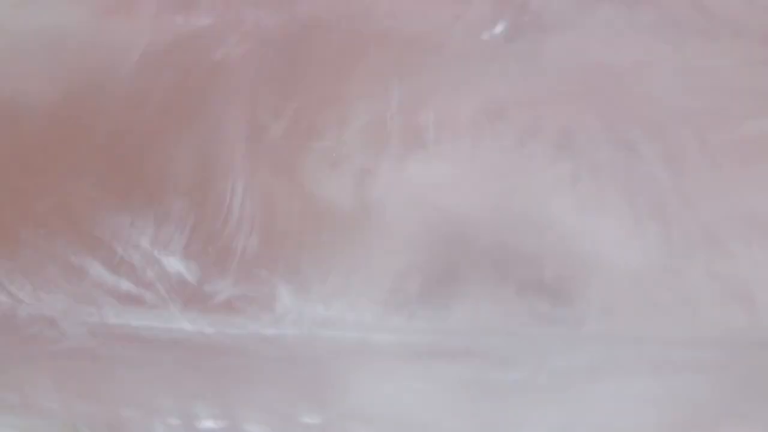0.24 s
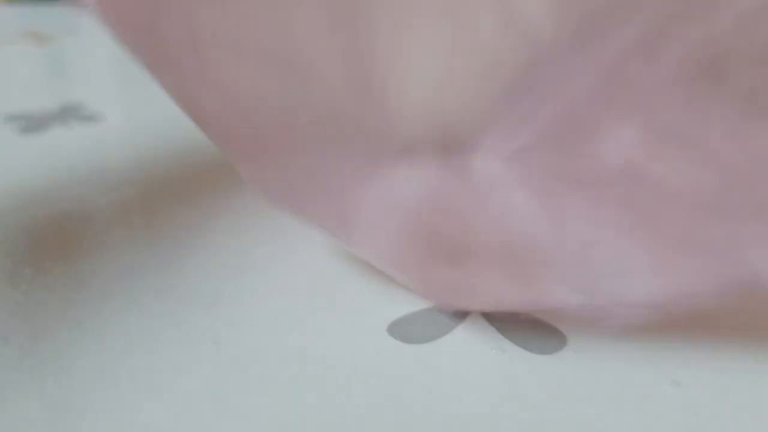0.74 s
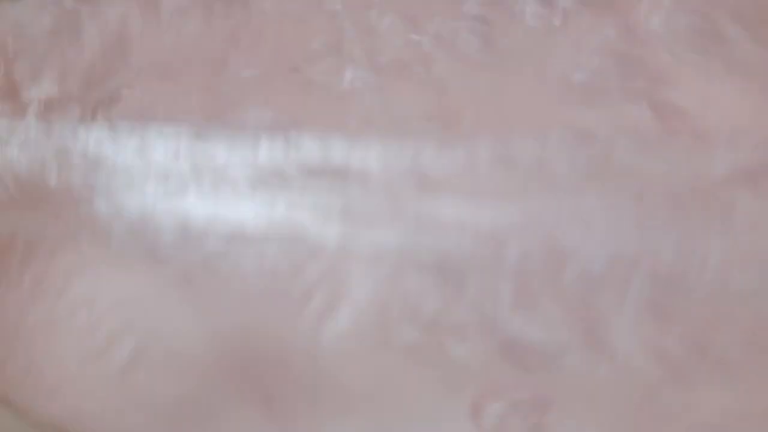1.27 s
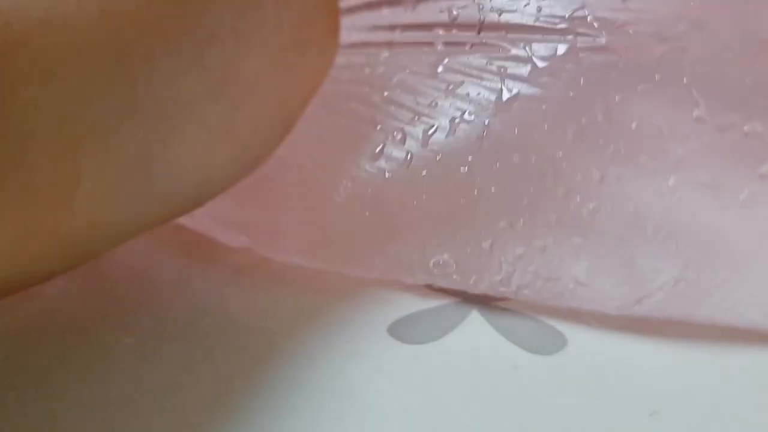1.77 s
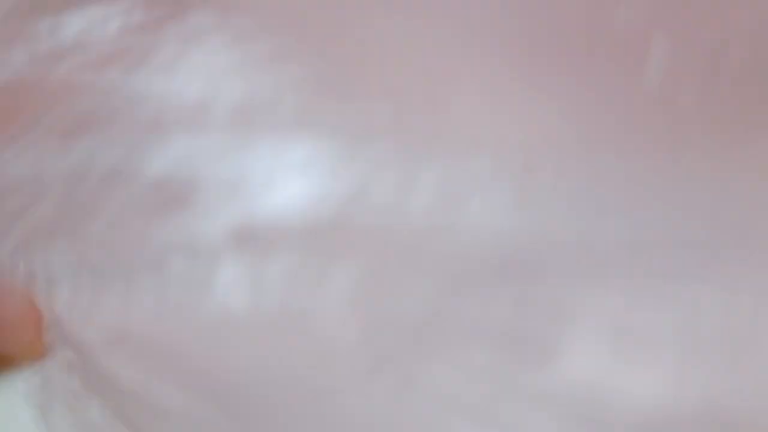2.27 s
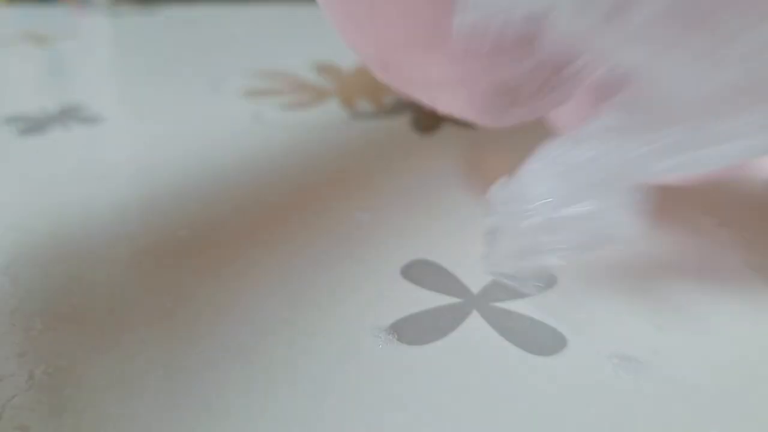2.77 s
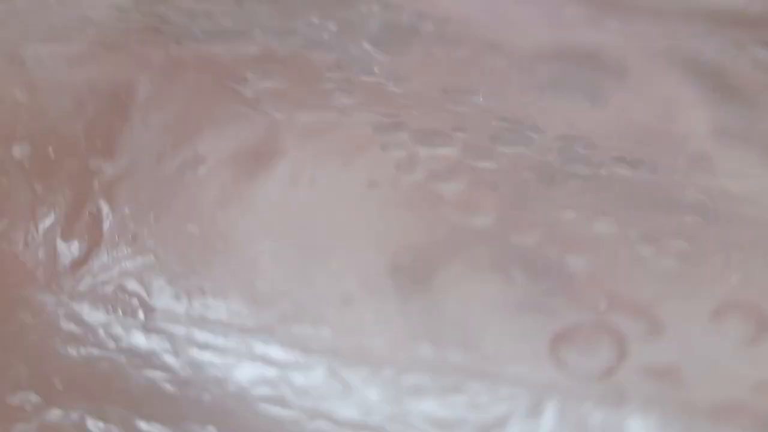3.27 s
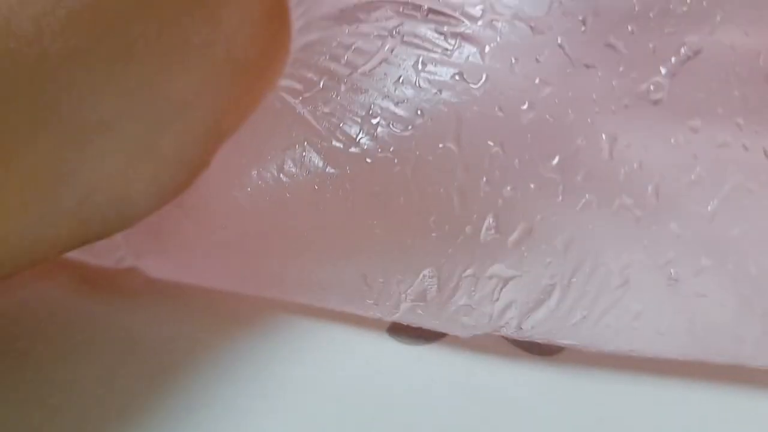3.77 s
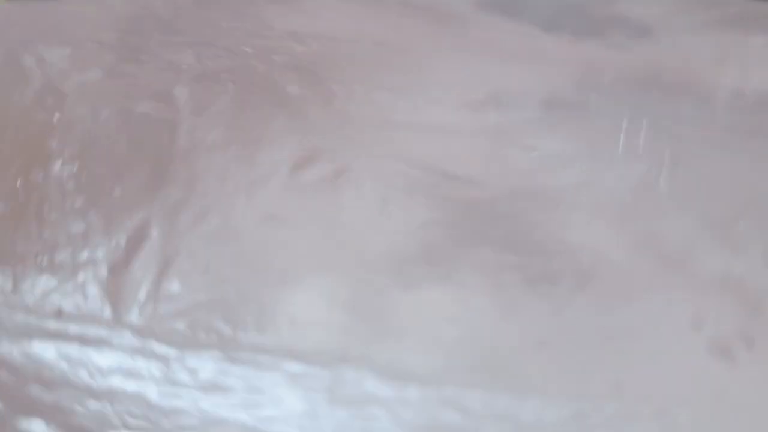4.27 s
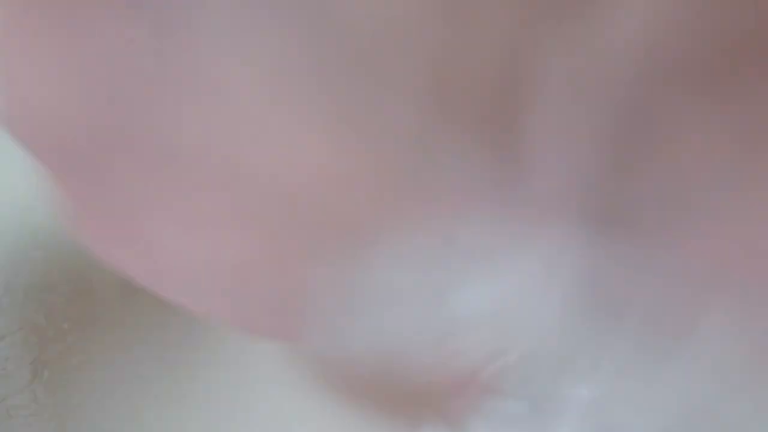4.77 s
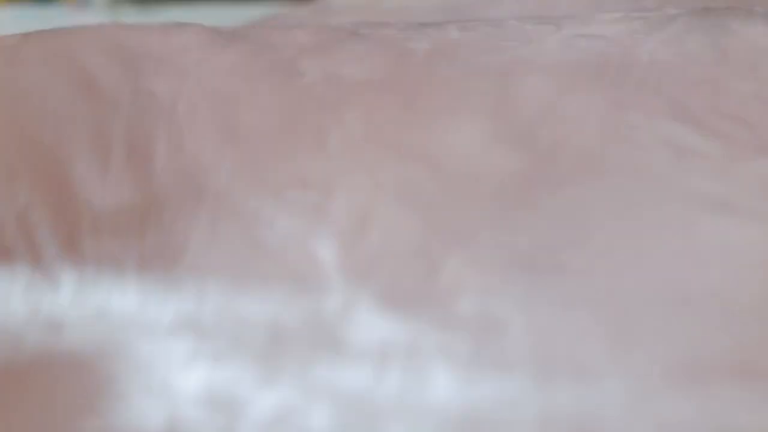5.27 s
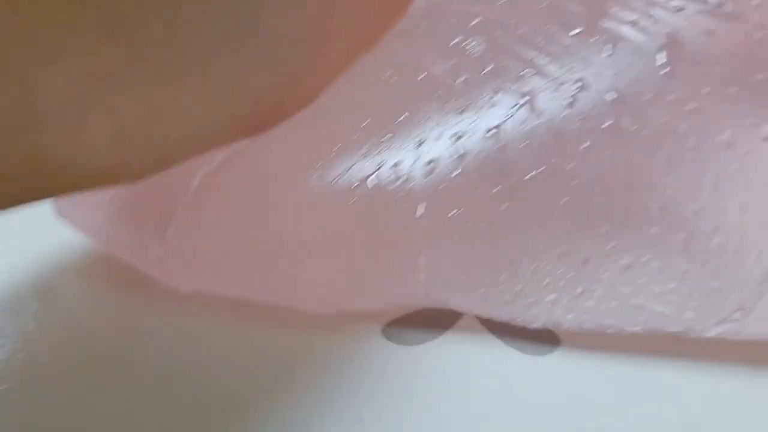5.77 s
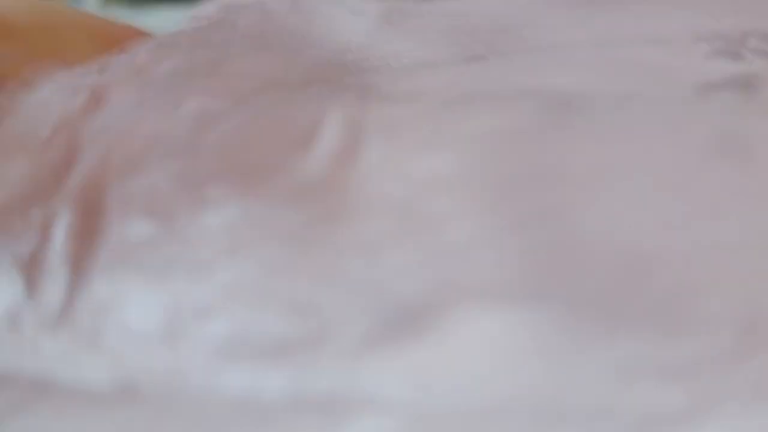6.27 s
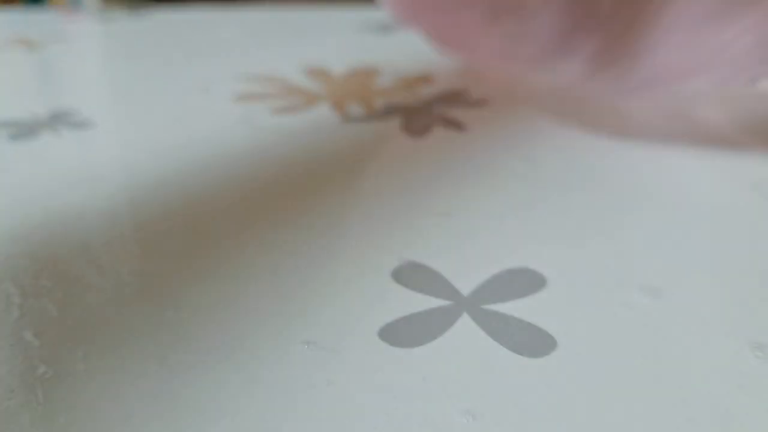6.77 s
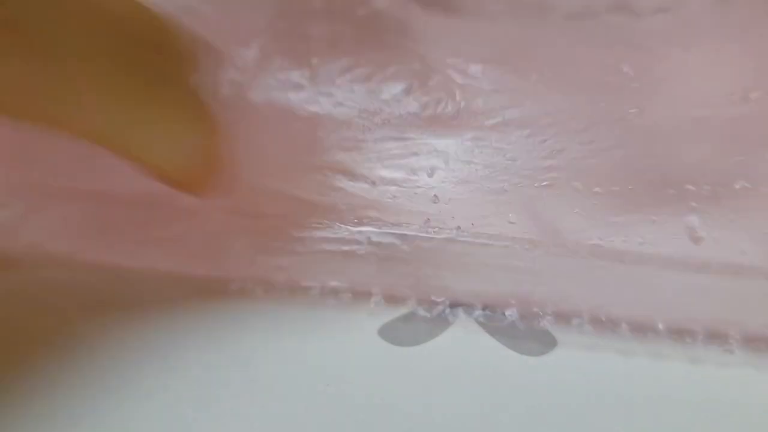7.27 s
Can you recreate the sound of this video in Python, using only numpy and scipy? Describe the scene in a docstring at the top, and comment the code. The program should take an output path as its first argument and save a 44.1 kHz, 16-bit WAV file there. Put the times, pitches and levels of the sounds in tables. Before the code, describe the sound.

Very close to the microphone, fingers press, fold and squeeze a soft lump of slime on a table. Irregular bursts of wet squelch and sticky crackle swell and fade, studded with sharp little pops as trapped air bursts. The strongest presses come near one second, just before two, after three, near four and at five and a half, with quieter fiddling between. Small quiet room, short tail, faint hiss.

```python
"""Squeezing a lump of slime

Fingers press, fold and squeeze slime on a table, close to the microphone in a small quiet room with faint hiss.
When a trapped air pocket bursts, shaped noise makes the tick and crack of its skin, a short sine its cavity.
Random clicks through resonators make squelch, bubbles and sticky crackle that swell with each press.
Closing folds gloop, sinking sines thump under the strongest slaps, and the room adds tail and standing waves."""
import sys
import numpy as np
from scipy import signal
from scipy.fft import rfft, irfft
from scipy.io import wavfile
from scipy.ndimage import uniform_filter1d

SR = 44100
rng = np.random.default_rng(int(sys.argv[2]) if len(sys.argv) > 2 else 0)


def materialize(psi):
    """Save the field psi as 16-bit PCM at rate SR to the path in sys.argv[1].

    A 1-D psi becomes a single channel; in a 2-D psi each row is a channel.
    """
    bounded = np.clip(np.atleast_2d(psi).T, -1, 1)
    quanta = np.round(bounded * 32767).astype(np.int16)
    wavfile.write(sys.argv[1], SR, quanta)


N = 332073  # length in samples


def from_db(db):
    """Turn decibels into a gain."""
    return 10 ** (np.asarray(db) / 20)


def rms_one(x):
    """Scale a sound to an rms (average strength) of 1."""
    return x / np.sqrt(np.mean(x ** 2) + 1e-20)


def at_hz(points, hz):
    """Read a table of (Hz, value) between its points, on a log-frequency axis."""
    known_hz, values = np.transpose(points)
    return np.interp(np.log(np.maximum(hz, 1)), np.log(known_hz), values)


def response(spectrum, size=2048):
    """Make a filter for a colour: it never sounds ahead of its input (minimum phase) and has unit energy."""
    level_db = at_hz(spectrum, np.fft.rfftfreq(size, 1 / SR))
    cepstrum = irfft(np.log(from_db(level_db)))
    # folding the second half onto the first gives minimum phase
    cepstrum[1:size // 2] *= 2
    cepstrum[size // 2 + 1:] = 0
    impulse = irfft(np.exp(rfft(cepstrum)))
    return rms_one(impulse) / np.sqrt(size)


def colour(x, spectrum):
    """Filter a sound so that its frequencies get the balance of a colour table."""
    return signal.fftconvolve(x, response(spectrum))[:len(x)]


def own_colour(spectrum, spread_db, shift=1):
    """No two skins tear alike: each gets its own peaks and dips, and may lie higher or lower."""
    hz, level_db = np.transpose(spectrum)
    return np.column_stack([hz * shift, level_db + spread_db * rng.standard_normal(len(hz))])


def add(out, s, sound):
    """Mix a sound in at a time in seconds."""
    start = max(round(s * SR), 0)
    out[start:start + len(sound)] += sound[:max(N - start, 0)]


def resonator(hz, t60):
    """Filter coefficients of something that rings at hz and dies by 60 dB in t60 seconds."""
    r, w = from_db(-60 / (t60 * SR)), 2 * np.pi * hz / SR
    return [1 - r, 0, r - 1], [1, -2 * r * np.cos(w), r * r]


def hiss(level_db=-76.5):
    """Faint steady hiss: random noise with a colour of its own."""
    # Balance of the hiss. Each row: frequency in Hz, relative level in dB per Hz.
    hiss_colour = [(20, -15), (60, 7), (150, 1.5), (500, -12.5), (1000, -0.5), (2000, -21), (5500, -15.5),
                   (8200, 3), (10500, -2.5), (12000, -44.5), (16000, -16.5)]
    return from_db(level_db) * rms_one(colour(rng.standard_normal(N), hiss_colour))


def tear(t, noise, t60, rise_s, lumpy_db):
    """A skin gives way in a rush of uneven little snaps."""
    lumps = rms_one(uniform_filter1d(noise[1], round(SR / 2000)))
    strength = from_db(lumpy_db * lumps - 60 * t / t60)
    return noise[0] * strength * (1 - np.exp(-(t / rise_s) ** 2))


def cavity(t, hz, t60, opening_cycles, rise):
    """An air pocket swells over its first cycles, then dies; its pitch climbs by rise, or sinks if negative."""
    pitch = hz * (1 + rise * (np.tanh(t / t60 * 2) - .5))
    swell = 1 - np.exp(-(t * hz / opening_cycles) ** 2)
    return np.sin(2 * np.pi * np.cumsum(pitch) / SR) * swell * from_db(-60 * t / t60)


def pops(rows, tick_t60=0.022, crack_t60=0.048, upper_ratio=1.45, upper_db=-11, low_hz=170, size=2048):
    """Each burst is a tearing skin (tick and crack) and its ringing cavity; returns direct sound and room feed."""
    # Balance of the bright tick, then of the skin crack.
    # Each row: frequency in Hz, relative level in dB per Hz.
    tick_colour = [(100, -46), (3000, -23.5), (5500, -14), (6500, -3.5), (7200, -5), (8000, 6), (9000, 2.5),
                   (10400, -7), (11000, -17), (11700, -55.5), (13400, -23.5), (15500, -47)]
    crack_colour = [(150, -35.5), (500, -13), (1500, 4.5), (3000, 4), (4600, 0.5), (5600, -19.5),
                    (8000, -33.5)]
    level_span_s = .005  # the row levels are rms over this time
    usual_pocket_hz, crack_follows_pitch = 1400, 0.14  # a smaller pocket has a higher crack
    skin_room_db, cavity_room_db = -0.5, 1  # share of each that reaches the room

    direct, feed, t = np.zeros(N), np.zeros(N), np.arange(size) / SR
    chance = rng.standard_normal((len(rows), 4, size))
    scale = np.sqrt(level_span_s * SR / size)
    for (s, tick_db, crack_db, body_db, hz, t60), noise in zip(rows, chance):
        snap = tear(t, noise[:2], tick_t60, rise_s=0.00036, lumpy_db=9.0)
        snap = rms_one(colour(snap, own_colour(tick_colour, spread_db=3.0)))
        crack = tear(t, noise[2:], crack_t60, rise_s=0.0011, lumpy_db=3.0)
        shift = (hz / usual_pocket_hz) ** crack_follows_pitch
        crack = rms_one(colour(crack, own_colour(crack_colour, spread_db=4.5, shift=shift)))
        skin = from_db(tick_db) * snap + from_db(crack_db) * crack
        # a flattened pocket has a second, weaker mode above its first
        main, upper = [rms_one(cavity(t, hz * ratio, t60, opening_cycles=2.43, rise=0.14))
                       for ratio in (1, upper_ratio)]
        ring = from_db(body_db) * (main + from_db(upper_db) * upper)
        add(direct, s, scale * (skin + ring))
        add(feed, s, scale * (from_db(skin_room_db) * skin + from_db(cavity_room_db) * ring))
    # such small sources radiate hardly any bass
    bass_cut = signal.butter(2, low_hz, "high", fs=SR, output="sos")
    return signal.sosfilt(bass_cut, np.array([direct, feed]) + 1e-18)


def effort():
    """Each press swells to its peak and fades; returns the levels of squelch, bubbles and crackle in dB."""
    # Presses and pulls of the fingers. Each row: time of greatest force in seconds, swell in seconds,
    # fade in seconds, then base levels in dB of the deep squelch, small bubbles and sticky crackle.
    presses = [(.005, 0.023, 0.032, -62, -44.5, -47), (.1, 0.052, 0.089, -84, -54, -48.5),
               (0.208, 0.075, 0.11, -51.5, -34.5, -33.5), (0.532, 0.051, 0.052, -57, -55, -53),
               (0.663, 0.058, 0.093, -77, -50, -44), (.88, 0.12, 0.16, -88, -75, -67),
               (0.978, 0.036, 0.18, -52, -31, -31), (1.094, 0.025, 0.098, -40, -38, -46.5),
               (1.451, 0.065, 0.14, -53, -46, -46), (1.55, 0.06, 0.14, -51, -44.5, -47.5),
               (1.69, 0.089, 0.1, -43, -33.5, -33.5), (1.749, 0.12, 0.15, -50.5, -41.5, -46.5),
               (1.9, .04, 0.13, -74, -51, -52), (2.075, 0.087, 0.12, -62, -38.5, -51.5),
               (2.25, 0.054, .09, -81, -46.5, -53.5), (2.44, 0.088, 0.095, -80, -41.5, -44),
               (2.559, .04, 0.025, -67.5, -55.5, -72), (2.724, 0.032, 0.13, -67.5, -66.5, -62.5),
               (2.86, 0.045, 0.083, -78, -43.5, -43), (2.96, 0.036, 0.031, -85.5, -56, -48),
               (3.031, 0.11, 0.13, -91.5, -76, -66.5), (3.259, 0.1, 0.12, -33, -35, -36.5),
               (3.599, 0.022, 0.05, -71, -55, -50), (3.76, 0.13, 0.15, -43.5, -43.5, -40.5),
               (3.888, 0.052, 0.056, -27.5, -30, -43), (4.01, 0.1, 0.13, -55.5, -50, -51.5),
               (4.16, 0.15, 0.14, -70, -50, -59), (4.331, 0.086, 0.14, -91, -60.5, -60),
               (4.46, .08, 0.12, -92, -62, -57), (4.658, 0.063, 0.11, -49, -37.5, -31.5),
               (4.77, 0.036, 0.056, -50.5, -63, -44.5), (4.99, 0.025, 0.088, -53.5, -55, -55.5),
               (5.181, 0.055, 0.09, -67, -44, -38.5), (5.35, .1, 0.17, -95, -73.5, -65.5),
               (5.52, 0.062, 0.12, -40.5, -26.5, -32.5), (5.59, .05, 0.083, -31, -37.5, -38.5),
               (5.986, 0.037, 0.074, -63, -50.5, -48), (6.075, .08, 0.15, -53.5, -46, -43.5),
               (6.15, 0.043, 0.045, -44.5, -38, -50), (6.225, 0.056, 0.071, -47, -48.5, -43.5),
               (6.29, .05, 0.21, -50.5, -46, -46), (6.38, 0.098, 0.095, -56.5, -55.5, -44.5),
               (6.48, 0.033, 0.082, -84, -61, -53.5), (6.601, 0.053, 0.14, -70, -39.5, -48.5),
               (6.66, 0.063, 0.07, -75.5, -43, -44), (6.87, 0.057, .04, -83, -74, -53),
               (6.94, 0.057, 0.092, -58.5, -38.5, -33), (7.02, 0.058, 0.091, -54.5, -41.5, -44.5),
               (7.26, 0.041, .06, -70.5, -59, -59), (7.334, 0.023, 0.035, -47, -32, -48),
               (7.413, 0.12, 0.13, -68.5, -49, -47)]
    # a swell or fade spans 20 dB; the squelch needs more force: it comes later and stops sooner
    swing_db = 20 * np.array([[1.3], [1], [1]])
    swell_shape, fade_shape = 1.61, 1.09  # 1 is a straight slope in dB, 2 a rounded one
    # before a swell and after a fade the sound drops this quickly
    finger_lands_s, finger_lifts_s = 0.012, .05

    t = np.arange(0, N / SR, .002)
    power = np.full((3, len(t)), 1e-12)
    for s, swell_s, fade_s, *levels_db in presses:
        early, late = np.maximum(s - t, 0), np.maximum(t - s, 0)
        slack = (early / swell_s) ** swell_shape + (late / fade_s) ** fade_shape
        before = np.maximum(early - swell_s, 0) / finger_lands_s
        after = np.maximum(late - fade_s, 0) / finger_lifts_s
        drop_db = swing_db * np.minimum(slack + before + after, 10)
        power += from_db(np.array(levels_db)[:, None] - drop_db) ** 2
    return [np.interp(np.arange(N) / SR, t, 10 * np.log10(p)) for p in power]


def small_pops(bubbles_db, sticky_db, count=130):
    """Small pockets burst at random, as strongly as the fingers press, each at its own pitch; rows for pops."""
    low_hz, high_hz, cycles, spread_db = 950, 2980, 28, 1.5
    tick_db, crack_db, cavity_db = -1.5, -9, -2.5  # against the crackle, the crackle and the bubbles
    when, place = rng.random((2, count))
    skin_luck, pocket_luck = spread_db * np.clip(rng.standard_normal((2, count)), -2, 2)
    at = (when * N).astype(int)
    hz = low_hz * (high_hz / low_hz) ** place
    skin_db, pocket_db = sticky_db[at] + skin_luck, bubbles_db[at] + pocket_luck
    return np.column_stack([at / SR, skin_db + tick_db, skin_db + crack_db, pocket_db + cavity_db,
                            hz, cycles / hz])


def clicks(per_s, spread_db):
    """Random impulses, mostly small and a few large."""
    sizes = from_db(spread_db * np.minimum(rng.exponential(1, N), 4))
    return sizes * rng.choice([-1, 1], N) * (rng.random(N) < per_s / SR)


def bubble_cloud(per_s, spread_db, low_hz, high_hz, cycles, count=24):
    """Many tiny pockets open, each swelling and ringing a few cycles at one of several pitches."""
    bursts, dealt, out = clicks(per_s, spread_db), rng.integers(0, count, N), 0
    for k, hz in enumerate(np.geomspace(low_hz, high_hz, count)):
        b, a = resonator(hz, cycles / hz)
        # passing the resonance twice rounds the onset; higher pockets are spaced wider, so the sum stays flat
        out = out + signal.sosfilt([b + a, b + a], bursts * (dealt == k) + 1e-18)
    return out


def steady(x, span_s):
    """Even out the slow level of a texture and keep its grain."""
    power = uniform_filter1d(x ** 2, int(span_s * SR))
    return x / np.sqrt(np.maximum(power, 0) + 1e-3 * np.mean(x ** 2))


def kneading(squelch_db, bubbles_db, sticky_db):
    """Clouds of ringing pockets, low to high, make squelch, bubbles and crackle that swell with each press."""
    # Balance of each texture. Each row: frequency in Hz, relative level in dB per Hz.
    squelch_colour = [(60, -28), (180, -17.5), (255, 0.5), (330, -3.5), (400, -0.5), (520, 0), (700, -3),
                      (1100, 10.5), (2500, -48)]
    bubbles_colour = [(450, -28), (750, -13), (1050, 5.5), (1300, 3.5), (1550, 4.5), (1850, -1.5),
                      (2300, 5.5), (3200, -13), (5000, -26)]
    sticky_colour = [(1500, -14), (2800, 3), (4600, 0.5), (5600, -14), (6500, -1), (7200, -6.5),
                     (8100, 4.5), (9200, -4.5), (10500, -15), (11700, -36), (13400, -38.5), (15500, -49)]
    squelch = bubble_cloud(per_s=400, spread_db=4.0, low_hz=256.3, high_hz=900, cycles=2.8)
    bubbles = bubble_cloud(per_s=700, spread_db=2.0, low_hz=735, high_hz=3400, cycles=13)
    sticky = bubble_cloud(per_s=2000, spread_db=1.0, low_hz=2455, high_hz=11900, cycles=10)
    squelch = steady(colour(squelch, squelch_colour), span_s=0.08)
    bubbles = steady(colour(bubbles, bubbles_colour), span_s=0.051)
    sticky = steady(colour(sticky, sticky_colour), span_s=0.028)
    return (from_db(squelch_db + 1.0) * squelch
            + from_db(bubbles_db + 1.35) * bubbles
            + from_db(sticky_db - 0.05) * sticky)


def room(x, first_echo_s=0.0023, build_s=0.004, count=16):
    """A diffuse tail of noise bands builds after the first echo, each dying at its own pace."""
    # Loudness of the room's answer. Each row: frequency in Hz, level in dB.
    room_gain = [(100, -15), (190, -9), (260, 1), (340, 2), (600, 1), (1000, -7.5), (2000, -10),
                 (4000, -12.5), (8000, -12.5), (14000, -8.5)]
    # How long the answer lasts. Each row: frequency in Hz, time to die by 60 dB in seconds.
    room_t60 = [(150, 0.45), (400, 0.19), (1000, 0.23), (2800, 0.16), (8000, 0.18), (14000, 0.27)]
    t = np.arange(SR * 3 // 5) / SR
    hz, centres = np.fft.rfftfreq(len(t), 1 / SR), np.geomspace(100, 16000, count)
    noise, tail = rfft(rng.standard_normal(len(t))), 0
    onset = 1 - np.exp(-np.maximum(t - first_echo_s, 0) / build_s)
    for centre, share in zip(centres, np.eye(count)):
        band = irfft(noise * np.interp(hz, centres, share), len(t))
        decay = rms_one(onset * from_db(-60 * t / at_hz(room_t60, centre))) / np.sqrt(len(t))
        tail = tail + band * decay * from_db(at_hz(room_gain, centre))
    return signal.fftconvolve(x, tail)[:N]


def standing_waves(x):
    """A few room resonances sing on after each squish."""
    # Standing waves between table and walls.
    # Each row: frequency in Hz, relative level in dB, time to die by 60 dB in seconds.
    room_modes = [(264, 9, .3), (450, 0, .3), (525, 0, .28), (802, 0, .4), (907, -2, .28), (1007, 0, .3),
                  (1092, -1, .3), (1157, -3, .25), (1539, -4, .25), (2097, -5, .22), (2398, -6, .22)]
    out = 0
    for hz, level_db, t60 in room_modes:
        b, a = resonator(hz, t60)
        out = out + from_db(level_db) * signal.lfilter(b, a, x)
    return out


def gloops():
    """A closing fold rings low and soft, sinking in pitch as its mouth narrows."""
    # Folds closing over large, soft pockets. Each row: start in seconds, level in dB ahead of swell and fade,
    # middle pitch in Hz, time to die by 60 dB in seconds.
    closing_folds = [(0.526, -41, 620, 0.026), (0.547, -42, 720, 0.04), (1.068, -28.5, 457, 0.12),
                     (1.087, -17, 317, 0.022), (1.369, -44.5, 309, 0.025), (1.67, -19.5, 765, 0.12),
                     (1.733, -45, 285, 0.12), (3.902, -32, 480, 0.048), (4.775, -38, 465, 0.031),
                     (4.984, -49, 556, 0.017), (5.259, -34, 626, 0.014), (5.013, -48, 280, 0.023),
                     (6.462, -33.5, 340, 0.013), (7.335, -27.5, 815, 0.046)]
    out, t = np.zeros(N), np.arange(SR // 8) / SR
    for s, level_db, hz, t60 in closing_folds:
        add(out, s, from_db(level_db) * cavity(t, hz, t60, opening_cycles=0.86, rise=-0.063))
    return out


def slap_thumps(start_hz=230, end_hz=45, sink_s=0.0092):
    """Soft low thumps, each a fading sine; the microphone's bass filter makes their pitch sink."""
    # Soft low thumps under the strongest slaps.
    # Each row: start in seconds, starting level in dB, time to die by 60 dB in seconds.
    low_thumps = [(0.975, -43, 0.13), (1.062, -50, 0.098), (1.664, -37, 0.075), (2.181, -58, 0.13),
                  (3.2, -38, 0.092), (3.225, -40, 0.15), (3.891, -52, 0.15), (4.168, -55, 0.036),
                  (5.26, -29, 0.017), (5.5, -59, .12), (6.318, -47, .07), (6.369, -34.5, 0.048)]
    out, t = np.zeros(N), np.arange(SR // 5) / SR
    pitch = end_hz + (start_hz - end_hz) * np.exp(-t / sink_s)
    thump = np.sin(2 * np.pi * np.cumsum(pitch) / SR)
    for s, level_db, t60 in low_thumps:
        add(out, s, from_db(level_db - 60 * t / t60) * thump)
    return out


def scene():
    """Mix the slime, its room and a faint hiss."""
    # The larger air pockets bursting. Each row: start in seconds, tick level in dB, skin crack level in dB,
    # cavity level in dB, cavity pitch in Hz, time for the cavity to die by 60 dB in seconds.
    large_pops = [(.0048, -29, -40, -48, 2150, 0.016), (0.1414, -37, -34, -34.5, 2280, 0.019),
                  (0.1587, -24.5, -21.5, -46, 2080, 0.033), (0.167, -38, -32, -23.5, 2300, 0.0051),
                  (.1816, -29, -50, -24.5, 2300, 0.012), (.189, -30, -41, -30, 1310, 0.011),
                  (0.2014, -33, -29, -21.5, 1200, 0.0064), (.215, -30, -34, -24.5, 1074, 0.019),
                  (0.266, -34, -32, -35, 2530, 0.013), (0.2921, -32, -28, -28.5, 4370, 0.01),
                  (0.3012, -42, -30.5, -32, 1020, 0.0048), (0.485, -48, -82, -52.5, 1130, 0.018),
                  (0.5152, -73, -70, -34, 1024, 0.016), (0.588, -41.5, -70, -68.5, 960, 0.013),
                  (.671, -44, -43.5, -61.5, 1490, .013), (0.861, -44.5, -57, -53.5, 1380, 0.043),
                  (0.9456, -41, -32.5, -32, 900, 0.032), (0.966, -24, -20.5, -19.5, 1636, 0.039),
                  (0.9723, -17, -16, -13.5, 1190, 0.072), (0.9991, -20, -19, -18.5, 1090, 0.03),
                  (1.0608, -21.5, -18.5, -21.5, 985, 0.0098), (1.487, -39, -32, -35.5, 3420, 0.023),
                  (1.5218, -38, -30.5, -30.5, 3400, 0.0038), (1.5535, -34.5, -49, -42, 2270, .009),
                  (1.5764, -29.5, -31.5, -34.5, 1270, .0085), (1.632, -53, -55, -30, 714, 0.0076),
                  (1.6416, -30.5, -27, -40, 1180, 0.013), (1.6591, -23, -16, -13.5, 1600, .009),
                  (1.6637, -12.5, -18, -16.5, 1632, 0.048), (1.8438, -37.5, -37.5, -50.5, 1360, 0.023),
                  (1.894, -46, -41, -40.5, 900, 0.025), (1.96, -42.5, -47, -42.5, 4110, .007),
                  (1.997, -47, -39, -36.5, 1200, 0.019), (2.028, -30.5, -37.5, -55.5, 1660, .018),
                  (2.077, -60, -34.5, -30.5, 1550, 0.0048), (2.1167, -72, -41, -31.5, 1530, 0.027),
                  (2.1617, -71, -52, -26, 2260, 0.026), (2.1791, -70, -35.5, -19, 1106, 0.026),
                  (2.3733, -29.5, -30.5, -28.5, 1570, 0.06), (2.3817, -52, -41, -28, 1540, .016),
                  (2.498, -62, -57, -42, 1400, .015), (2.556, -59, -46, -58.5, 1596, .005),
                  (2.701, -51.5, -58, -70.5, 1100, .01), (2.761, -42, -69, -66.5, 2080, .011),
                  (2.8455, -40, -37, -25.5, 3110, 0.0038), (3.113, -45, -58, -48.5, 3400, 0.0053),
                  (3.1592, -32.5, -33, -25, 2006, 0.053), (3.166, -21, -28, -18.5, 1670, 0.011),
                  (3.197, -23, -24.5, -21, 1040, 0.034), (3.21, -22, -21, -29, 1060, 0.011),
                  (3.225, -15.5, -29, -13, 1015, .017), (3.2325, -30, -19, -14.5, 1065, 0.025),
                  (3.2539, -17.5, -29, -24.5, 914, 0.062), (3.278, -29, -24, -18.5, 920, 0.0096),
                  (3.6504, -42, -64, -50, 1010, 0.0089), (3.6692, -36.5, -61, -60, 820, 0.034),
                  (3.73, -32, -45, -40, 1170, .02), (3.7508, -24, -29.5, -11, 1250, 0.005),
                  (3.779, -36, -48, -33, 1130, .008), (3.8024, -41, -34, -32, 960, 0.0033),
                  (3.8402, -34, -40, -36, 716, 0.029), (3.8685, -35, -23, -16, 1045, 0.042),
                  (3.891, -26, -20.5, -29, 1060, 0.0037), (3.9108, -24, -27.5, -21.5, 2000, 0.0033),
                  (4.0797, -38.5, -55, -33.5, 2410, 0.0057), (4.1115, -68, -30, -32.5, 943, 0.011),
                  (4.1204, -29, -50.5, -36.5, 930, 0.0044), (4.1673, -24.5, -39.5, -33.5, 4140, 0.011),
                  (4.2982, -57, -41.5, -47.5, 1250, 0.014), (4.373, -50, -49, -45.5, 3670, 0.01),
                  (4.567, -42.5, -63.5, -47.5, 3270, .008), (4.6233, -40, -23.5, -32.5, 2430, 0.0055),
                  (4.6319, -21.5, -27.5, -28, 1120, 0.0036), (4.662, -39, -21, -24, 3080, 0.002),
                  (4.6757, -42, -47, -20.5, 2100, 0.0038), (4.7436, -34, -29.5, -25.5, 1630, 0.0028),
                  (4.834, -47.5, -48.5, -38, 3175, 0.0035), (4.9566, -44.5, -64.5, -54.5, 1050, 0.027),
                  (5.145, -28, -45, -41.5, 1130, .005), (5.1821, -35, -24.5, -30.5, 2370, 0.0071),
                  (5.2573, -21, -38.5, -41, 1610, 0.0065), (5.4618, -23, -25, -21, 1347, 0.032),
                  (5.4905, -22, -21.5, -20, 973, 0.017), (5.5058, -20, -19, -14.5, 1020, 0.0027),
                  (5.507, -37, -17, -23.5, 1160, 0.0042), (5.5402, -18, -16, -16.5, 1070, 0.013),
                  (5.573, -28, -27, -19, 950, 0.0025), (5.9654, -34, -46, -49.5, 2140, 0.006),
                  (6.015, -41.5, -53, -41.5, 1010, 0.0053), (6.0243, -31.5, -39, -38.5, 1610, 0.0062),
                  (6.089, -43, -39, -36, 1140, 0.0093), (6.134, -58, -38, -30.5, 1400, 0.0075),
                  (6.156, -38, -38, -28, 1300, 0.0048), (6.1727, -35.5, -34.5, -32.5, 2140, 0.011),
                  (6.208, -33.5, -26, -29.5, 990, 0.0074), (6.2776, -35, -54, -60, 870, .013),
                  (6.296, -33, -51, -37.5, 4100, 0.006), (6.3156, -20, -26, -24.5, 4080, .003),
                  (6.369, -17.5, -23, -37.5, 2470, 0.0023), (6.4156, -31.5, -55, -49.5, 3340, .008),
                  (6.471, -62, -45, -44.5, 920, 0.018), (6.5695, -79, -43, -22, 1847, 0.094),
                  (6.6085, -56.5, -31, -24, 1630, 0.013), (6.9071, -30.5, -38, -28, 1370, 0.036),
                  (6.9157, -31.5, -36, -32.5, 3400, 0.011), (6.9292, -27, -25.5, -30, 1214, 0.038),
                  (6.9374, -26.5, -25, -17.5, 2770, 0.0033), (7.041, -31.5, -32.5, -33, 4080, 0.0097),
                  (7.0966, -46, -41.5, -29, 2160, 0.009), (7.233, -57, -54.5, -49, 4000, .011),
                  (7.244, -55, -56, -45, 1040, 0.053), (7.317, -68.5, -30.5, -23.5, 1380, 0.054),
                  (7.376, -41, -39.5, -37.5, 1080, 0.0075)]
    texture_direct_db, texture_room_db = 0.5, 1  # the kneaded lump: to the microphone, and into the room
    standing_db = 0.5  # standing waves against the diffuse tail

    squelch_db, bubbles_db, sticky_db = effort()
    texture = kneading(squelch_db, bubbles_db, sticky_db)
    folds = gloops()
    direct, feed = pops(np.vstack([large_pops, small_pops(bubbles_db, sticky_db)]))
    feed = feed + folds + from_db(texture_room_db) * texture
    echo = room(feed) + from_db(standing_db) * standing_waves(feed)
    mix = direct + folds + from_db(texture_direct_db) * texture + echo + slap_thumps() + hiss()
    return mix[None]  # one channel


def record(dry, top=0.72, treble_hz=14800, cutoff_hz=15600):
    """The sharpest peaks are rounded, the highest treble rolls off and the top is cut."""
    rounded = top * np.tanh(dry / top)
    rolled_off = signal.sosfilt(signal.butter(4, treble_hz, fs=SR, output="sos"), rounded)
    return signal.sosfilt(signal.ellip(10, .1, 80, cutoff_hz, fs=SR, output="sos"), rolled_off)


dry = scene()
out = record(dry)
materialize(out)
```